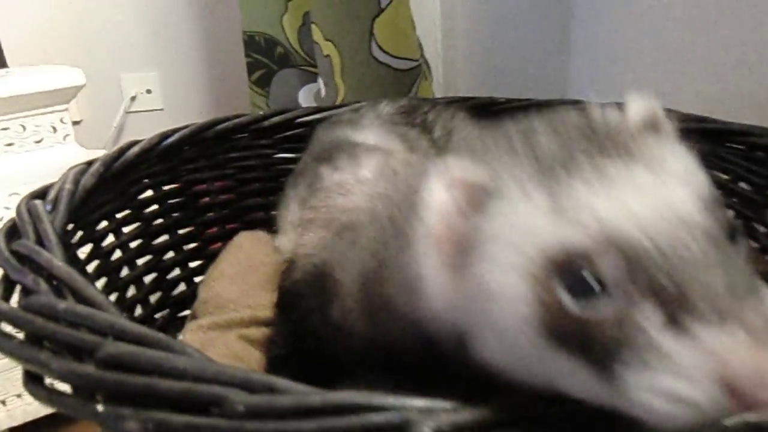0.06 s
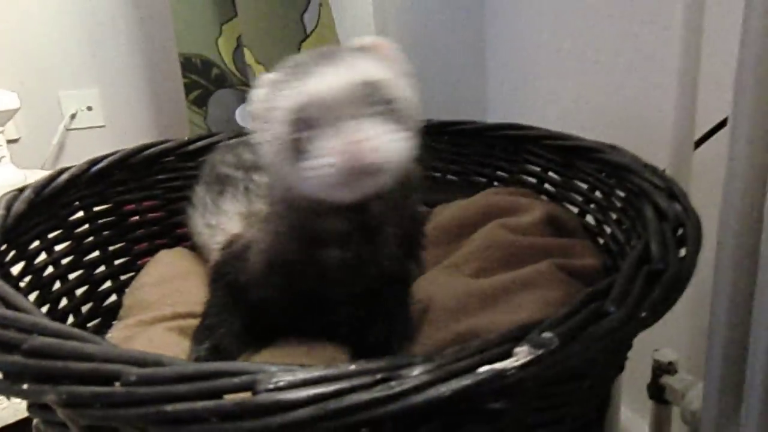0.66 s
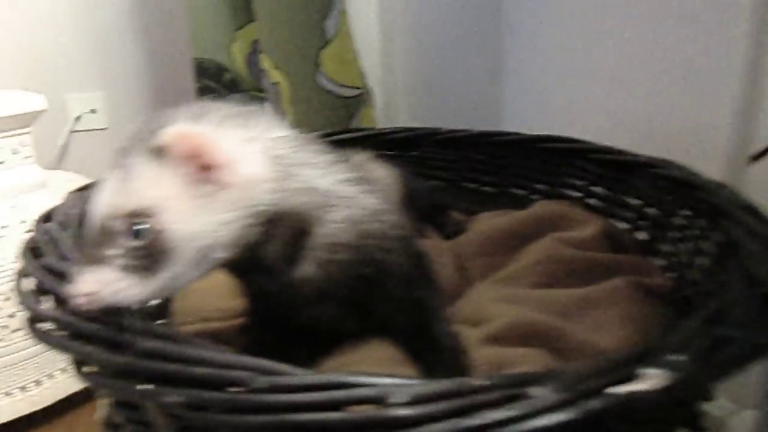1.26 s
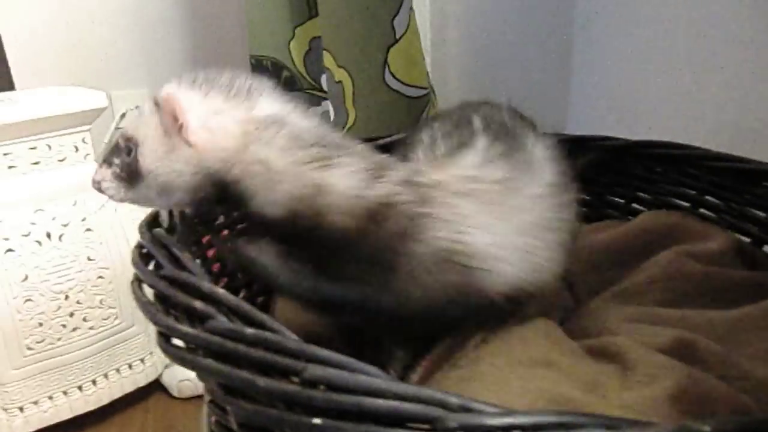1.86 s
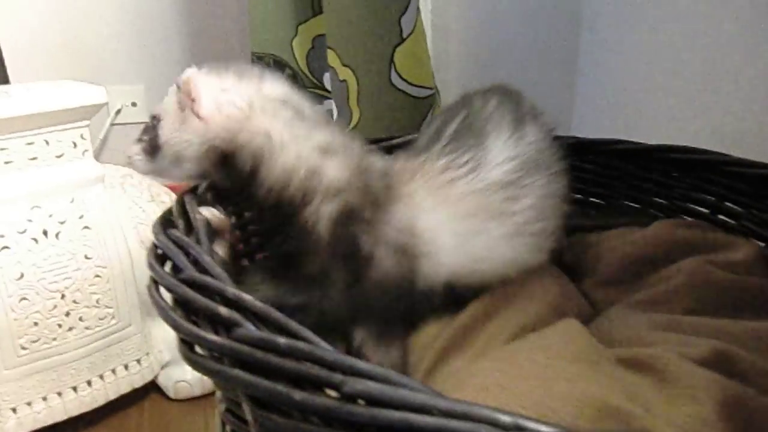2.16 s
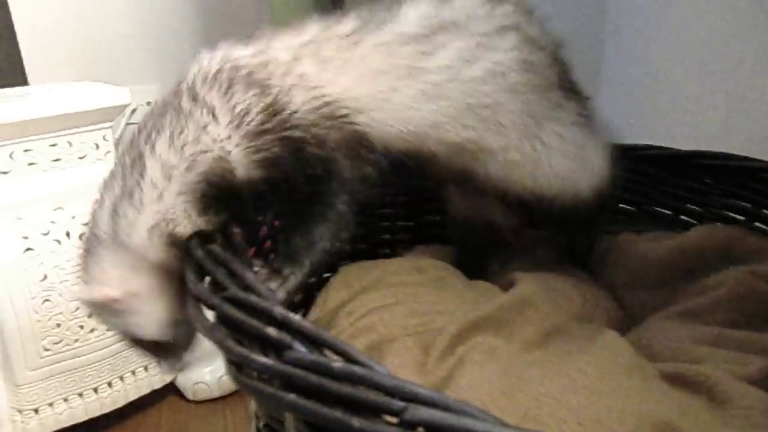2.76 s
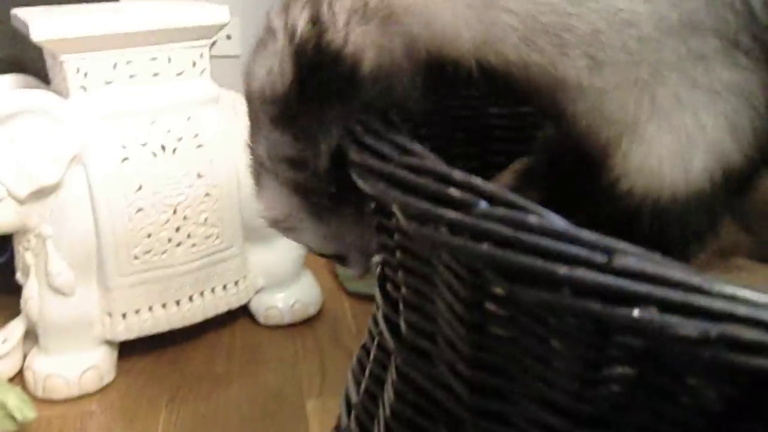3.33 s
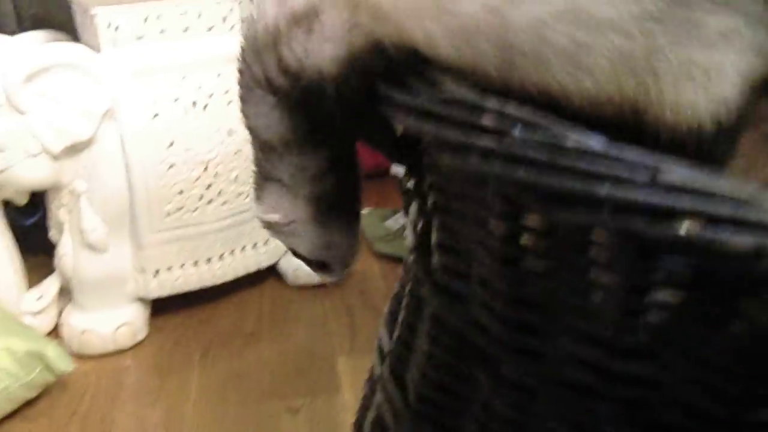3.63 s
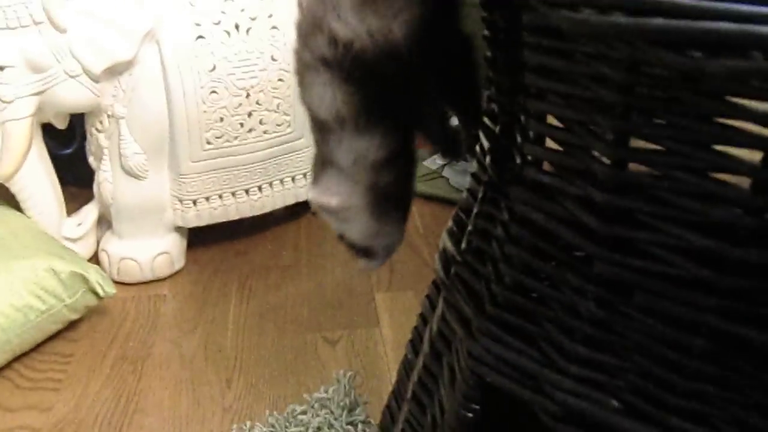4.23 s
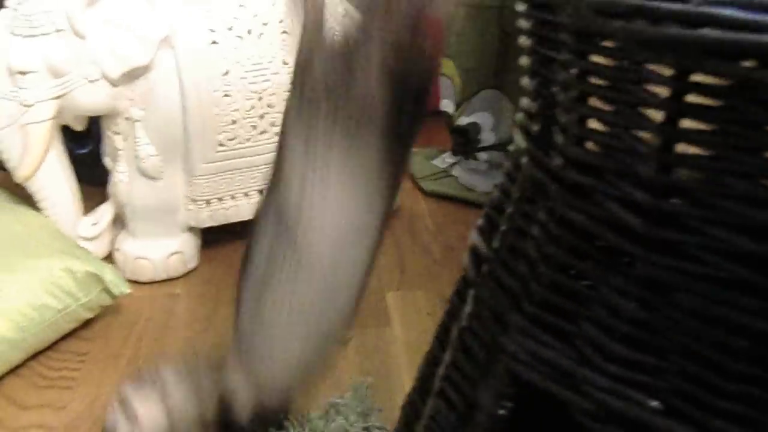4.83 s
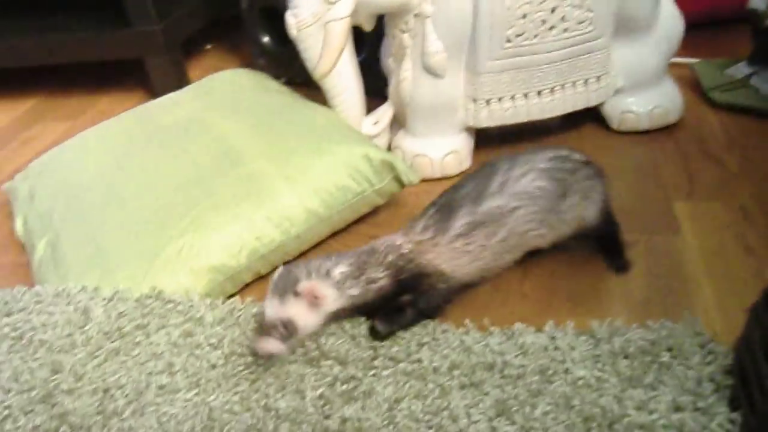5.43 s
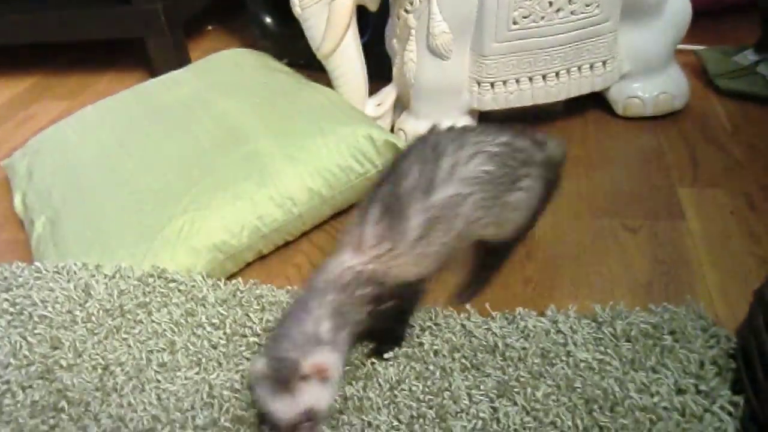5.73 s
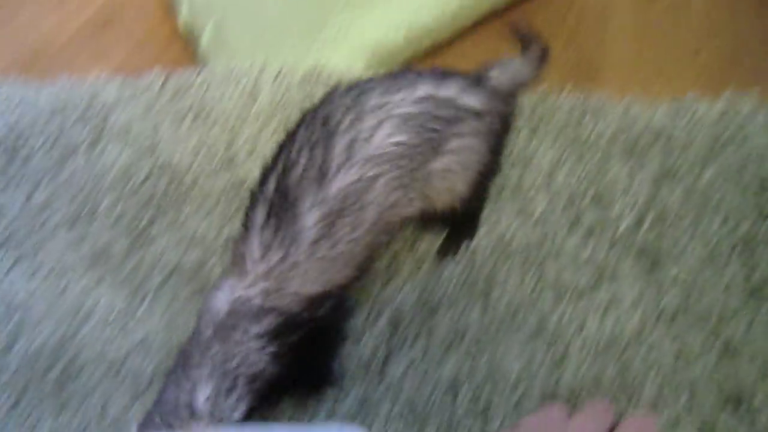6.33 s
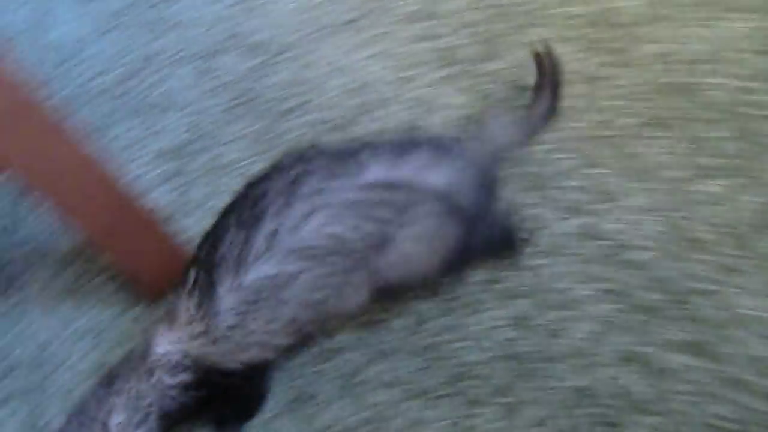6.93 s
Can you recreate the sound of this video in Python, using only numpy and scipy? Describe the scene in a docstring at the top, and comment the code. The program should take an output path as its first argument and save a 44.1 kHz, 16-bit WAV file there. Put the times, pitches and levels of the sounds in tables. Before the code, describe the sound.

In a quiet room, a ferret's fur brushes softly against a wicker basket. After a pause the canes creak and snap sharply as it climbs the rim. Fur and claws rustle and tick down the weave over a faint low rumble, then paws and basket land on the floorboards in a quick cluster of booming thumps and scratches. Last, a hand softly brushes a shaggy rug. Everything sounds close, with light room reverberation.

```python
"""Fur brushes softly against wicker in a quiet room: a ferret is shifting about in its basket.
The canes creak and snap, and fur and claws rustle down the weave as it climbs the rim.
The basket leans with a low rumble, then claws scrape and paws and basket thump onto booming floorboards.
Last, a hand brushes a shaggy rug."""
import sys
import numpy as np
from scipy import signal
from scipy.fft import rfft, irfft, next_fast_len
from scipy.io import wavfile

SR = 44100
rng = np.random.default_rng(int(sys.argv[2]) if len(sys.argv) > 2 else 0)


def store_wav(level_fs):
    """Save 16-bit WAV to argv[1]."""
    pcm = np.round(np.clip(np.atleast_2d(level_fs), -1, 1) * 32767)
    wavfile.write(sys.argv[1], SR, pcm.T.astype(np.int16))


N = 308259
TIME = np.arange(N) / SR
BANDS_HZ = 45 * 2 ** (np.arange(18) / 2)   # half-octave centres
# paws and basket landing on the boards:
# (time [s], level [dB], softness corner [Hz], boom [dB re knock], scratch [dB re level])
LANDINGS = [(2.186, -31.5, 393, -7, -11), (2.206, -49, 380, -14, -24), (2.366, -42.5, 326, -23, -14),
            (3.164, -41.5, 346, 5, -32), (3.6846, -34.5, 350, -6, -9.5), (3.742, -42.5, 650, -5, -15),
            (3.796, -45, 400, -5, -6), (4.814, -19.5, 794, -2, -23), (4.835, -23.5, 357, -3, -23),
            (4.868, -29.5, 380, -15, -25), (4.892, -32, 400, -19, -20), (5.0589, -25.5, 630, -0.5, -7),
            (5.073, -27, 218, -6.5, -15), (5.117, -30, 330, -1, -11.5), (5.128, -26.5, 220, 3.5, -20),
            (5.169, -17.5, 627, -1, -20.5), (5.2092, -18.5, 490, -9, -21), (5.251, -28, 415, 1.5, -37),
            (5.436, -49, 736, -13.5, -2)]


def from_db(db):
    """Decibels to gain."""
    return 10 ** (np.asarray(db) / 20)


def unit_energy(x):
    """Scale to a sum of squares of 1."""
    return x / np.sqrt(np.sum(x ** 2) + 1e-20)


def unit_rms(x):
    """Scale to an rms of 1."""
    return unit_energy(x) * np.sqrt(len(x))


def in_time(rows, column=1):
    """One column of an automation curve at every sample."""
    return np.interp(TIME, np.array(rows)[:, 0], np.array(rows)[:, column])


def at_hz(rows, hz, column=1):
    """One column of a table read on a log-frequency axis."""
    return np.interp(np.log(hz), np.log(np.array(rows)[:, 0]), np.array(rows)[:, column])


def cut(x, hz, kind, order=2):
    """Butterworth filter."""
    return signal.sosfilt(signal.butter(order, np.clip(hz, 10, .45 * SR), kind, fs=SR, output="sos"), x)


def resonate(x, hz, width_hz):
    """A resonance with a peak gain of 1."""
    r = np.exp(-np.pi * width_hz / SR)
    feedback = [1, -2 * r * np.cos(2 * np.pi * hz / SR), r * r]
    return signal.lfilter(np.array([1, 0, -1]) * (1 - r * r) / 2, feedback, x + 1e-18)


def noise(spectrum):
    """Steady noise of a given colour, rms 1."""
    size = next_fast_len(N)
    hz = np.maximum(np.fft.rfftfreq(size, 1 / SR), 1)
    coloured = rfft(rng.standard_normal(size)) * from_db(at_hz(spectrum, hz))
    return unit_rms(irfft(coloured, size)[:N])


def band_noise(hz, size):
    """Half an octave of white noise around hz, with the filter already settled."""
    edges_hz = hz * np.sqrt(2) ** np.array([-.5, .5])
    return cut(rng.standard_normal(size + SR // 10), edges_hz, "band")[-size:]


def add(track, s, sound):
    """Mix a sound in at time s."""
    start = int(s * SR)
    track[start:start + len(sound)] += sound[:N - start]


def swells(rows, attack_s=0.027, release_s=0.023):
    """Envelope of overlapping gestures: each rises to its start, holds and dies away; powers add."""
    power = np.zeros(N)
    for s, length, db in rows:
        attack = np.minimum(TIME - s, 0) / attack_s
        release = np.maximum(TIME - s - length, 0) / release_s
        power += (from_db(db) * np.exp(attack - release)) ** 2
    return np.sqrt(power)


def rubbing(gain, spectrum, grain_db, grains_per_s):
    """Friction noise that catches and lets go from fibre to fibre."""
    catch = np.interp(TIME * grains_per_s, np.arange(N), rng.standard_normal(N))
    return gain * unit_rms(from_db(grain_db * catch)) * noise(spectrum)


def room_tone(air_db=-51, notes_hz=(660, 505), width_hz=70):
    """A bed of steady air with two faint hollow notes."""
    # colour of the air: (frequency [Hz], density [dB])
    air_colour = [(12, -54), (20, -2.5), (55, -0.5), (138, -3), (210, -3), (399, -7.5), (485, -9),
                  (624, -10.5), (802, -11.5), (1260, -13), (1440, -14), (2080, -17.5), (4300, -23),
                  (11800, -33), (16000, -35)]
    # hollow notes, changing with the place in the room: (time [s], upper note [dB], lower note [dB])
    note_levels = [(0, -63.5, -74), (1, -61.5, -68), (3, -63, -67.5), (4.5, -63.5, -64.5),
                   (5.7, -69, -62.5), (6.99, -65, -56.5)]
    out = from_db(air_db) * noise(air_colour)
    for column, hz in enumerate(notes_hz, start=1):
        note = unit_rms(resonate(rng.standard_normal(N), hz, width_hz))
        out += from_db(in_time(note_levels, column)) * note
    return out


def fur_rustle():
    """Fur and claws slide along the weave: a long grainy drag with short strokes on top."""
    # the body drags over the rim, harder as it slides out: (time [s], level [dB])
    drag = [(0, -61.5), (.55, -68), (.8, -84), (1.7, -75), (2.4, -61.5), (3.1, -66.5), (3.6, -57.5),
            (4.3, -54), (4.9, -53.5), (5.3, -60), (6.1, -77), (6.99, -62.5)]
    # strokes of fur and claws: (start [s], length [s], level [dB])
    strokes = [(0.1, .17, -56.5), (1.81, 0.086, -53.5), (1.97, 0.044, -54), (2.17, 0.17, -52.5),
               (3.2, 0.064, -59), (3.44, 0.33, -54.5), (4.43, 0.036, -52.5), (4.62, .14, -46),
               (5.04, 0.16, -48.5)]
    # colour of fur on wicker: (frequency [Hz], density [dB])
    fur_colour = [(700, -1.5), (1400, 0), (1700, -3), (2500, 2), (3300, -1.5), (4300, 0), (6000, -4),
                  (8300, -7.5), (9300, -11), (13000, -16), (16000, -25)]
    slide = np.hypot(from_db(in_time(drag)), swells(strokes))
    return rubbing(slide, fur_colour, grain_db=2.5, grains_per_s=300)


def rim_rub(tone_hz=1430, width_hz=220):
    """Light friction keeps one soft resonance of the rim sounding."""
    # fur rubs the near rim: (start [s], length [s], level [dB])
    rubs = [(0.03, .24, -61.5)]
    tone = resonate(resonate(rng.standard_normal(N), tone_hz, width_hz), tone_hz, width_hz)
    return swells(rubs) * unit_rms(tone)


def creak_slips(gap_s=0.0115, jitter=0.121, scatter_db=3.5, top_hz=6300, decay_ms=6.5, max_slips=10):
    """A loaded cane sticks and slips at a nearly even pace; gives rows for cane_cracks."""
    # creaks as the weight shifts: (start [s], length [s], slip level [dB], low edge [Hz])
    creaks = [(1.82, .055, -52.5, 2720), (1.962, .02, -49, 2500), (2.003, .02, -45, 3000),
              (2.038, .02, -49.5, 2500), (2.998, .01, -45, 3600), (3.238, .02, -46, 3800),
              (4.587, .033, -47, 3400), (5.701, .02, -60, 3500), (5.86, .045, -61, 3000),
              (5.949, .01, -54, 4400)]
    slips = []
    for s, length, level_db, low_hz in creaks:
        for k, (late, strong) in enumerate(rng.standard_normal((max_slips, 2))):
            if k * gap_s < length:
                start = s + gap_s * (k + jitter * late * min(k, 1))
                slips.append((start, level_db + scatter_db * strong, low_hz, top_hz, decay_ms))
    return slips


def cane_cracks(slips, spiky_db=3, rise_ms=0.94, shiver_db=-20, shiver_ms=13, tick_db=9,
                body_db=-4, splinter_db=-5, hard_db=-27, long_cane_hz=2400):
    """Each slip or hit is a tick and a fast burst of tiny cracks that shivers on through the weave."""
    # ringing of the woven canes: (frequency [Hz], width [Hz], gain [dB])
    cane_modes = [(1690, 500, -2), (1944, 75, -3.5), (2410, 37, 4), (2560, 35, -0.5), (2770, 23, 9.5),
                  (3250, 39, -33), (4070, 46, 0), (4330, 56, -7), (4660, 42, -6.5), (5450, 73, -7),
                  (6080, 40, -7), (7530, 330, -7), (9760, 1700, -11)]
    # hollow ringing of the whole basket: (frequency [Hz], width [Hz], gain [dB])
    basket_modes = [(256, 25, 10), (532, 90, 3), (816, 58, 2.5), (1290, 36, -21)]
    out, ms = np.zeros(N), 1000 * TIME[:SR // 10]
    for s, level_db, low_hz, high_hz, decay_ms in slips:
        white, sizes = rng.standard_normal((2, len(ms)))
        attack = 1 - np.exp(-ms / rise_ms)
        decay = np.exp(-ms / decay_ms) + from_db(shiver_db) * np.exp(-ms / shiver_ms)
        cracks = white * from_db(spiky_db * np.minimum(sizes, 2)) * attack * decay
        cracks[SR // 1500] += from_db(tick_db)
        # the slipping cane rings just above its low edge and shakes its neighbours
        cane = resonate(cracks, 1.15 * low_hz, width_hz=320)
        weave = sum(from_db(db) * resonate(cracks, hz, width) for hz, width, db in cane_modes)
        slip = cut(cracks + cane + weave, low_hz, "high", order=3)
        slip = cut(cut(slip, high_hz, "low"), 11000, "low", order=1)
        # a hard slip moves the whole basket if the cane is long, and splinters in the treble if sharp
        force = min(1, from_db(level_db - hard_db))
        body = sum(from_db(db + body_db) * resonate(cracks, hz, width) for hz, width, db in basket_modes)
        body = cut(body, 230, "high", order=3) * min(1, long_cane_hz / low_hz) ** 3
        sharpness = min(1, high_hz / 6000) ** 2
        splinters = from_db(splinter_db) * sharpness * resonate(cracks, hz=9900, width_hz=1300)
        slip += force * (body + splinters)
        add(out, s, from_db(level_db) * unit_energy(slip) * np.sqrt(0.013 * SR))   # rms as if 13 ms long
    return out


def wicker_hits():
    """Canes snap, then claws scrape and the basket knocks as it lands; gives rows for cane_cracks."""
    # sharp wicker sounds: (time [s], level [dB], low edge [Hz], high edge [Hz], decay [ms])
    hits = [(1.9856, -44, 2760, 5000, 5), (2.1316, -27, 3760, 7900, 2.7), (2.2448, -31, 3270, 9700, 11),
            (2.2563, -19, 1920, 5500, 2.4), (2.2628, -19.5, 1750, 5800, 3.4),
            (2.3620, -26, 2670, 6000, 3.6), (2.3655, -25.5, 2030, 4900, 3.1),
            (2.568, -40.5, 2270, 5970, 11), (3.011, -35, 2400, 8150, 6.7), (3.02, -31, 3100, 6000, 7.1),
            (3.0294, -33, 1740, 7500, 6.4), (3.032, -28, 4100, 7700, 2.2), (3.2565, -35.5, 2030, 2300, 8.3),
            (3.290, -54, 4500, 8500, 5), (3.554, -45, 2200, 4050, 12), (4.106, -39.5, 1830, 6500, 24),
            (4.149, -41.5, 1670, 7000, 4), (4.247, -38, 2470, 7700, 3.4), (4.421, -38.5, 3380, 4340, 10.5),
            (4.547, -36, 2570, 2400, 5.9), (4.627, -38, 3670, 7040, 4.3), (4.669, -40.5, 3170, 7400, 6),
            (4.717, -42.5, 2580, 7700, 7), (4.762, -46, 2200, 6360, 6.6), (4.8808, -39.5, 1290, 5560, 6),
            (4.893, -34.5, 1090, 1400, 3), (5.0020, -24, 710, 2500, 2.9), (5.008, -37, 1300, 5500, 13),
            (5.024, -37, 2260, 7600, 20), (5.083, -32.5, 1270, 1890, 11)]
    return hits


def thumps(rise_ms=0.82, scatter_db=1, slap_db=-4, slap_ratio=0.794, slap_width_hz=150, lowest_hz=66):
    """A landing slaps, knocks and sets the boards booming; padding lowers the slap and dulls the top."""
    # the dull knock: (frequency [Hz], level per half octave [dB], decay [ms])
    knock_bands = [(55, -16, 20), (86.5, -10, 20), (140, -1, 7.3), (244, 5, 34), (483, 0, 14),
                   (740, 2, 8.6), (1050, -2, 12), (1500, 1.5, 10), (4000, -2.5, 21), (12000, -3.5, 6)]
    # ringing of the floorboards: (frequency [Hz], level [dB], t60 [s])
    board_modes = [(88.1, -9.5, 0.6), (135.2, 2, 0.18), (158.7, -8, 0.38), (217.6, -1.5, 0.12),
                   (242, 0, 0.24), (326, -13, 0.24), (367, -27, 0.14), (464, -17.5, 0.97), (536, -16, .2),
                   (593, 1.5, 0.13), (740, -3.5, 0.082), (914, -10, 0.24)]
    out, t = np.zeros(N), TIME[:SR // 2]
    ms = 1000 * t
    for s, level_db, soft_hz, boom_db, _ in LANDINGS:
        slap = np.sin(2 * np.pi * slap_ratio * soft_hz * t) * np.exp(-np.pi * slap_width_hz * t)
        knock, boom = np.zeros((2, len(t)))
        for hz in BANDS_HZ:
            burst = band_noise(hz, len(t)) * np.exp(-ms / at_hz(knock_bands, hz, column=2))
            knock += from_db(at_hz(knock_bands, hz)) * unit_energy(burst)
        for hz, db, t60 in board_modes:
            ring = from_db(db + scatter_db * rng.standard_normal() - 60 * t / t60)
            boom += ring * np.sin(2 * np.pi * hz * t) * rng.choice([-1, 1])
        hit = from_db(slap_db) * unit_energy(slap) + unit_energy(knock)
        hit += from_db(boom_db) * unit_energy(boom)
        hit *= 1 - np.exp(-ms / rise_ms)
        hit = cut(hit, soft_hz, "low", order=1)
        hit = cut(hit, lowest_hz, "high", order=4)   # the boards radiate little below their lowest mode
        add(out, s, from_db(level_db) * unit_energy(hit) * np.sqrt(0.029 * SR))   # rms as if 29 ms long
    return out


def scratch_slips(lag_s=0.002, low_hz=1160, top_hz=4000, decay_ms=7.8):
    """Claws and canes scratch briefly as each landing makes contact; gives rows for cane_cracks."""
    return [(s + lag_s, level_db + scratch_db, low_hz, top_hz, decay_ms)
            for s, level_db, _, _, scratch_db in LANDINGS]


def basket_lean():
    """A low rumble swells each time the basket leans under the climb."""
    # the basket leans: (start [s], length [s], level [dB])
    leans = [(2.88, .42, -57), (3.7, .04, -49), (3.95, .2, -59)]
    # colour of the rumble: (frequency [Hz], density [dB])
    rumble_colour = [(15, -24), (40, -1), (65, 5), (110, 0), (200, -9), (500, -40), (2000, -70)]
    return swells(leans, attack_s=0.066, release_s=0.099) * noise(rumble_colour)


def rug_brush():
    """A hand sweeps through shaggy pile with a soft, almost smooth friction noise."""
    # sweeps of the hand: (start [s], length [s], level [dB])
    sweeps = [(6.42, 0.71, -59), (6.61, 0.12, -50)]
    # colour of the brushed pile: (frequency [Hz], density [dB])
    rug_colour = [(150, -39), (250, -11), (413, -8), (441, -7), (494, -4.5), (600, -11), (752, -8.5),
                  (2840, -17), (12000, -42), (15600, -69), (22000, -120)]
    gesture = swells(sweeps, attack_s=0.076, release_s=0.1)
    return rubbing(gesture, rug_colour, grain_db=0.5, grains_per_s=200)


def room_reverb(send, build_s=0.0053):
    """Diffuse reflections build up, then die band by band; the tail has unit energy."""
    # reverb tail: (frequency [Hz], density [dB], t60 [s])
    tail_bands = [(80, 12, 0.81), (240, 1, 0.74), (684, 3.5, 0.84), (1300, 13.5, 0.26), (2650, 6, 0.35),
                  (5000, 0.5, 0.48), (9000, 3, 0.31), (15000, -2.5, 0.39)]
    t, tail = TIME[:SR], np.zeros(SR)
    for hz in BANDS_HZ:
        fade_db = at_hz(tail_bands, hz) - 60 * t / at_hz(tail_bands, hz, column=2)
        tail += band_noise(hz, SR) * from_db(fade_db)
    build_up = 1 - np.exp(-(t / build_s) ** 2)
    return signal.fftconvolve(send, unit_energy(tail * build_up))[:N]


def scene():
    """Mono mix: wicker and floor share a light reverb, the rug stays dry, room tone lies underneath."""
    air = room_tone()
    floor = thumps() + basket_lean()
    rug = rug_brush()
    wicker = fur_rustle() + rim_rub() + cane_cracks(wicker_hits() + scratch_slips() + creak_slips())
    reverb = room_reverb(from_db(-15.5) * wicker + from_db(-16.5) * floor)
    return (wicker + floor + rug + reverb + air)[None]


def record(dry):
    """The microphone drops the deepest rumble; a steep low-pass cuts the top at 16 kHz."""
    top_cut = signal.ellip(10, .1, 80, 16000, fs=SR, output="sos")
    return signal.sosfilt(top_cut, cut(dry, 18, "high"))


dry = scene()
out = record(dry)
store_wav(out)
```